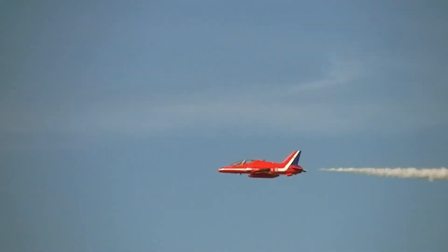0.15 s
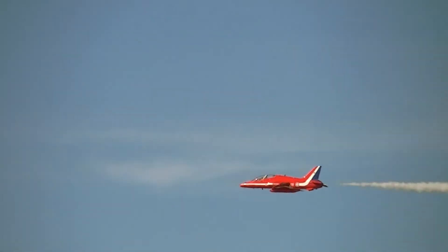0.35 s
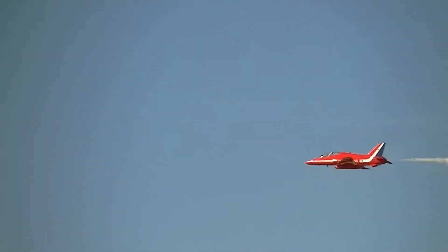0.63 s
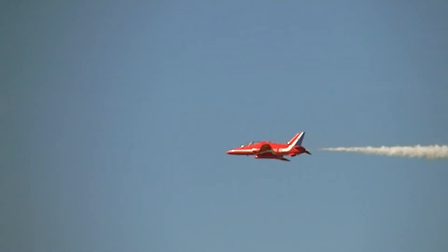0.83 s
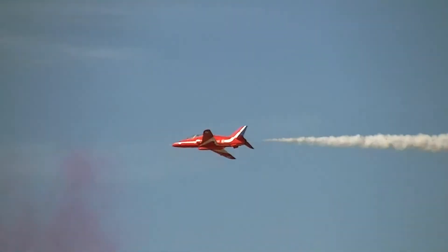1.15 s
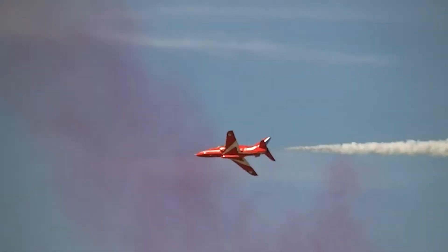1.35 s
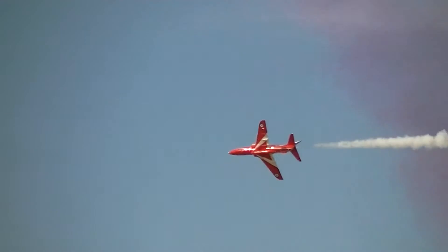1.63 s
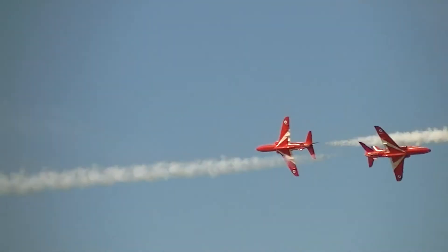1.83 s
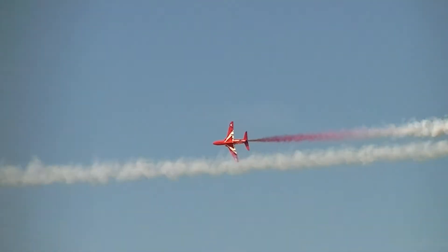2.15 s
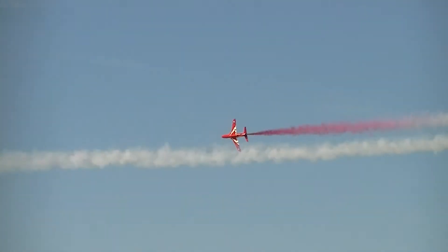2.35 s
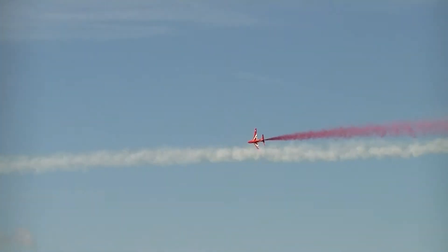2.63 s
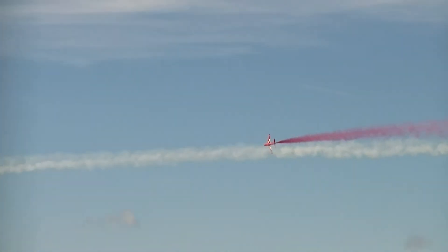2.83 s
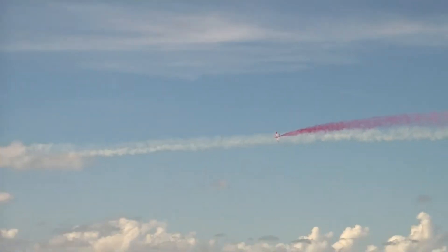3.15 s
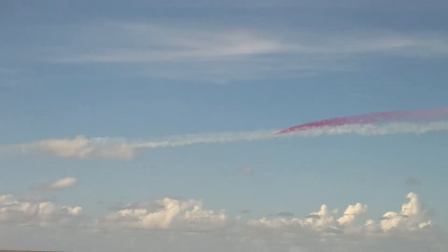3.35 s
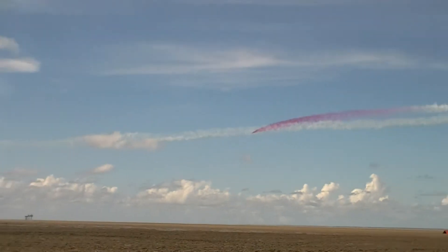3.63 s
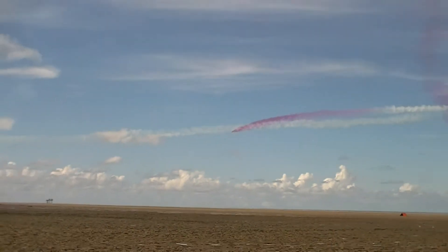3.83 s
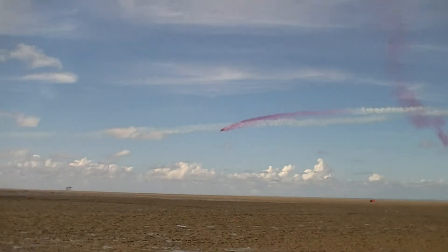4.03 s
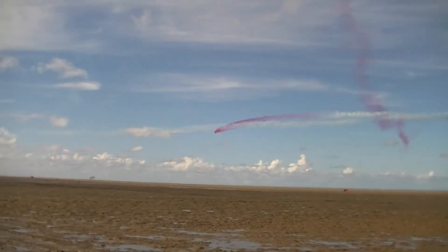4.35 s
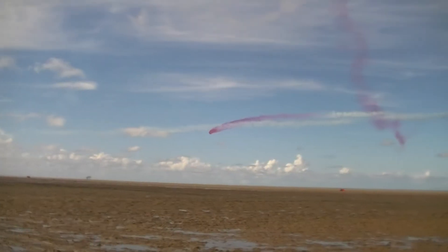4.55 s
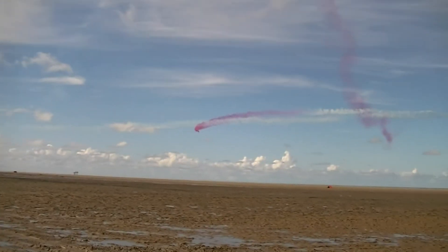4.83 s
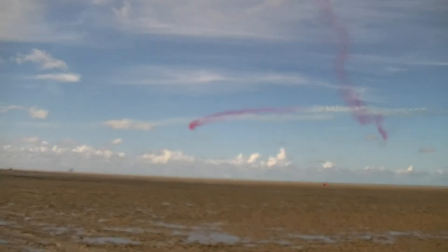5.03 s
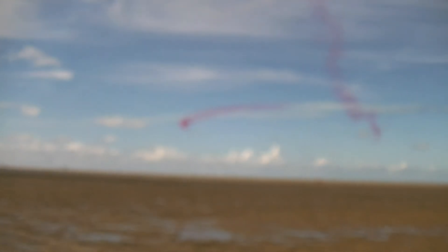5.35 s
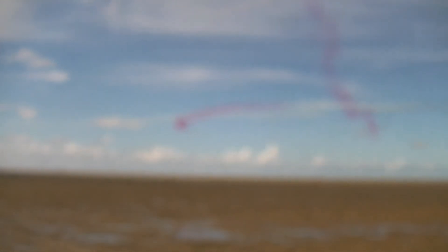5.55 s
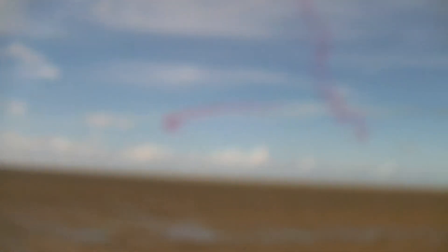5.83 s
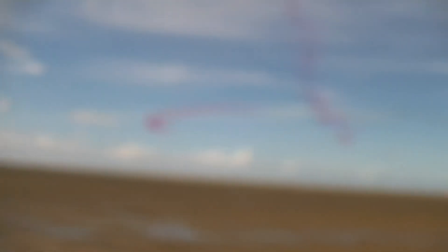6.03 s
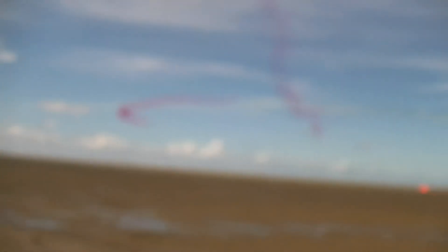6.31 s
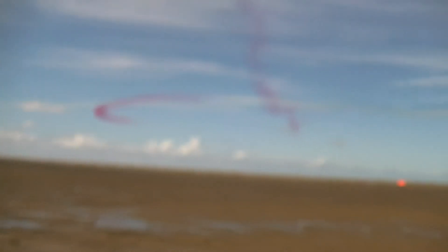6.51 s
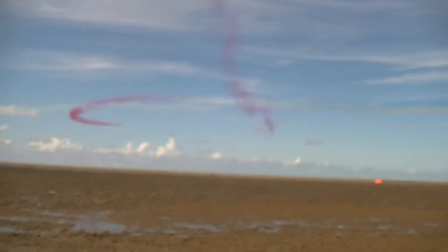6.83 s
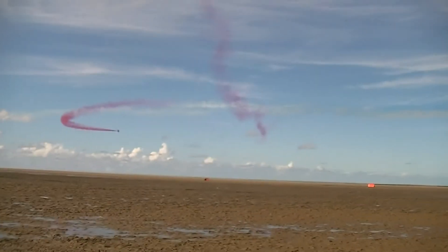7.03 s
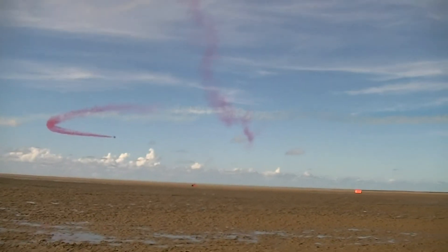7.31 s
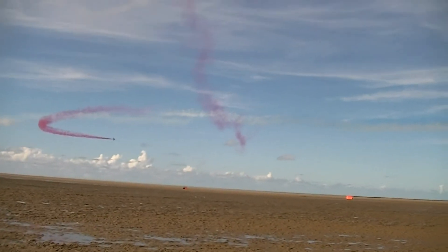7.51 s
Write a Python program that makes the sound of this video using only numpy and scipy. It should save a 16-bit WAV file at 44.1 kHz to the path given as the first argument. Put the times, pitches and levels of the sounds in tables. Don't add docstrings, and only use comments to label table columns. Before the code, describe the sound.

Outdoors on a wide flat beach, far jets make a broad, breathy mid-range roar that flutters and surges in the wind. A faint high whine slides down in the first half, the roar swells to its fullest past the middle, then turns duller and weaker. Gusts thump softly on a small camera microphone, with clicks, brief gain dips and fine gritty ticks.

```python
import sys
import numpy as np
from scipy import signal
from scipy.fft import rfft, irfft
from scipy.io import wavfile
from scipy.ndimage import uniform_filter1d

SR = 44100
rng = np.random.default_rng(int(sys.argv[2]) if len(sys.argv) > 2 else 0)


def put_to_file(sound):
    columns = np.atleast_2d(sound).T
    safe = np.clip(columns, -1, 1)
    whole_steps = np.round(safe * 32767)
    wavfile.write(sys.argv[1], SR, whole_steps.astype(np.int16))


def gain_from_db(level_db):
    decades = np.asarray(level_db, float) / 20
    return 10 ** decades


N = 338643

# time in seconds, level in dB, prominence of the middle of the roar in dB.
RUSH_LEVEL = [(0, -34.5, -2.5), (.7, -44, -3.5), (1.2, -31, 3.5), (2, -41, -3.5), (2.4, -33, 0),
              (3.3, -33.5, -1), (3.6, -30.5, 1.5), (3.8, -26.5, 3), (4.1, -29.5, 3), (4.75, -29.5, -1.5),
              (5.3, -23.5, 4), (5.7, -27.5, 1), (6.5, -29.5, -2), (7.35, -38, -4), (7.68, -35, -1.5)]
# frequency in Hz, density in dB per Hz.
RUSH_COLOUR = [(59, -82.5), (100, -53), (154, -29), (212, -20.5), (365, -10), (535, -3), (648, -2),
               (1170, -4.5), (1400, -6), (1950, -9.5), (3360, -23.5), (4550, -38), (5920, -58.5),
               (10000, -120)]
# time in seconds, first reinforced pitch in Hz, echo strength from 0 to 1.
GROUND_ECHO = [(0, 744, 0.15), (1, 775, 0.1), (2.2, 728, 0.03), (3.5, 910, 0.18), (4, 903, 0.33),
               (4.5, 800, 0.14), (5, 722, 0.22), (5.5, 690, 0.1), (6.3, 663, 0.14), (7, 681, 0.14),
               (7.68, 689, 0.3)]
# centre in seconds, half length in seconds, rise in dB.
SURGES = [(0.11, 0.025, 9.5), (0.279, 0.041, 4), (0.396, 0.032, 9.5), (0.562, 0.018, 17.5),
          (0.926, 0.015, 8.5), (1.231, 0.013, 3.5), (1.394, 0.025, 6), (1.513, 0.023, -1.5),
          (1.738, 0.077, 4.5), (1.915, 0.029, 4.5), (2.214, 0.069, 9.5), (3.135, 0.11, 2.5),
          (3.334, 0.089, 1), (3.526, 0.08, 3.5), (3.64, 0.037, 3.5), (3.904, 0.057, 11.5),
          (4.039, 0.065, 7), (4.269, 0.077, 10), (4.408, 0.067, 6.5), (4.622, 0.14, 5), (4.879, 0.034, 8),
          (5.133, 0.059, 4.5), (5.59, 0.019, 5.5), (5.996, 0.076, 7), (6.308, 0.064, 6.5),
          (6.626, 0.13, 3.5), (6.92, 0.071, 12.5), (7.093, 0.07, 7.5), (7.225, 0.017, 5.5),
          (7.534, 0.21, 6)]
# centre in seconds, half length in seconds, rise in
# dB.
FLUTTER = [(0.008, 0.029, 8), (.18, .025, 1.5), (0.482, 0.035, 6.5), (0.695, 0.037, 6), (1.007, 0.017, 9.5),
           (1.114, 0.011, 4), (1.15, 0.018, 4.5), (2.407, 0.089, 5), (2.84, 0.047, 1.5), (3.742, 0.01, 5),
           (4.149, 0.023, 8.5)]
# centre in seconds, half length in seconds, pitch in Hz, rise in dB.
FOCUSING = [(0.116, 0.024, 2600, 3), (0.109, 0.043, 1496, 1.5), (0.552, 0.027, 1400, -3.5),
            (0.922, 0.027, 4200, 9), (0.996, 0.027, 2200, -0.5), (1.109, 0.012, 2200, 9),
            (1.686, 0.023, 4300, 19), (1.987, .012, 4000, 10.5), (2.419, 0.032, 4100, 3.5),
            (3.476, 0.04, 2500, 9), (3.854, .03, 4000, -5), (3.899, 0.015, 2800, 5), (4.01, 0.037, 3000, 2),
            (4.385, .05, 5400, 2.5), (4.654, 0.069, 1100, 0), (5.102, 0.092, 5600, 1),
            (5.35, 0.26, 3450, 5.5), (5.407, 0.13, 2200, 3.5), (5.442, 0.073, 5500, 10.5),
            (4.545, 0.17, 3450, -2), (5.986, 0.083, 5500, 7.5), (0.288, 0.015, 3300, 8.5),
            (1.003, 0.044, 1530, -5.5), (1.23, 0.045, 1400, 9), (1.452, 0.05, 1790, 11.5),
            (1.512, 0.04, 1120, 13), (2.228, .04, 2060, 2.5), (3.346, 0.046, 2620, 9.5),
            (3.592, 0.12, 1840, 7), (3.907, 0.057, 1870, -6), (4.134, 0.15, 898, 8),
            (4.276, 0.048, 1470, -1), (4.418, 0.033, 1484, 9.5), (4.646, 0.04, 2110, 6.5),
            (4.877, 0.49, 934, 5), (5.186, 0.06, 1325, -2), (5.414, 0.093, 652, 11), (5.45, 0.55, 4530, 5),
            (5.502, 0.07, 2900, 7), (5.607, 0.008, 1200, 4.5), (5.997, 0.069, 1886, 4),
            (6.301, 0.029, 1194, 0.5), (6.238, .15, 620, 2.5), (6.792, 0.061, 660, 4.5),
            (6.961, 0.11, 800, 3), (6.908, 0.058, 1270, 2.5), (7.094, .03, 1403, 7.5),
            (7.561, 0.032, 880, 10)]
# time in seconds, pitch in Hz, level in dB,
# narrow share from 0 to 1.
FAN_WHINE = [(0, 3340, -60, .2), (.84, 3350, -59, .2), (.94, 3290, -43.5, .4), (1.03, 3330, -52, .3),
             (1.14, 3340, -46.5, .4), (1.3, 3350, -53, .3), (1.6, 3360, -54, .3), (1.85, 3370, -50.5, .4),
             (2.1, 3310, -54, .4), (2.3, 3260, -50, .7), (2.45, 3210, -42, .8), (2.65, 3130, -45.5, .75),
             (2.87, 3050, -45.5, .7), (3.2, 2950, -49, .5), (3.5, 2860, -48, .3), (3.75, 2800, -60, .3),
             (7.68, 2800, -95, .3)]
# time in seconds, level in dB.
FIZZ_LEVEL = [
    (0, -78),
    (.85, -76.5),
    (1.3, -73.5),
    (2, -74),
    (3.3, -73.5),
    (4.2, -79.5),
    (5.3, -78),
    (5.8, -80.5),
    (6.8, -81.5),
    (7.68, -88),
]
# frequency in Hz, density in dB per Hz.
FIZZ_COLOUR = [(3000, 5), (5500, -1), (8000, -11.5), (10000, -17.5), (12500, -26), (15500, -37),
               (18000, -77.5)]
# centre in seconds, half length in seconds, rise in dB.
RATTLES = [(.01, 0.035, 14), (.29, 0.1, 3), (.75, .035, 12.5), (1.68, 0.0099, 13.5), (1.74, 0.031, 10.5),
           (1.81, 0.017, 12), (1.9, .025, 9), (2.06, 0.037, 8.5), (2.185, 0.018, 6), (2.59, 0.021, 3),
           (3.21, 0.016, 12.5), (3.28, .035, 7), (3.685, 0.012, 11), (3.91, 0.062, 10.5), (6.225, .012, 10),
           (6.277, 0.022, 20), (6.1, .06, 5), (7.5, .06, 4)]
# time in seconds, level in dB.
BREEZE = [
    (0, -43.5),
    (1.4, -43),
    (2, -42.5),
    (2.8, -39),
    (3.2, -38),
    (4, -44),
    (5, -45.5),
    (6, -47),
    (7.68, -41.5),
]
# frequency in Hz, density in dB per Hz.
WIND_COLOUR = [(71, -69), (120, -39), (178, -27), (269, -3), (620, 1.5), (1120, -13), (2290, -22),
               (4550, -45.5), (5920, -83.5), (10000, -120)]
# centre in seconds, half length in seconds, rise in dB, left over right in dB.
GUSTS = [(.02, 0.056, 3.5, -9.5), (.422, 0.02, -6, 30), (.62, 0.088, 0.5, 7.5), (.8, 0.091, -4.5, 15),
         (1.185, 0.038, 8.5, -2), (1.44, 0.18, 9, 6.5), (2.014, 0.1, 7, 3), (2.378, 0.22, 3, 3),
         (2.98, 0.082, 3.5, -5.5), (3.434, 0.26, 3.5, -0.5), (3.76, 0.073, -1, -5.5),
         (4.122, 0.084, 9.5, 2.5), (4.85, 0.17, 9, 4.5), (5.22, 0.25, -6.5, 9), (5.508, 0.11, 6.5, -2),
         (5.79, 0.086, -0.5, -3), (6.42, 0.083, 10, 1), (7.22, 0.056, -3, 3), (7.45, 0.091, -7, -10.5)]
# time in seconds, click level in dB, duck depth in
# dB (none if negative).
LIMITER_SNAPS = [(0.0252, -44, 1), (0.1977, -36, 8.5), (0.3054, -54, -1.5), (0.321, -53.5, 3),
                 (0.418, -38, 12), (0.49, -47, 7.5), (0.578, -67, -5), (0.684, -44.5, -5), (0.861, -40, -4),
                 (0.8654, -30, 9), (1.0196, -52, 6), (1.166, -48.5, 3), (1.4056, -52, 4), (1.633, -60, 6),
                 (1.748, -45, 4.5), (1.7968, -61, 3), (1.9814, -46, -10), (2.13, -55, 3), (2.9005, -67, 1),
                 (3.0849, -46, -6), (3.2085, -58, 5.5), (3.6795, -65, 0.5), (4.2558, -41.5, -5),
                 (4.576, -57.5, 1), (4.947, -62, 2), (5.599, -62, 4), (6.274, -45, 0.5),
                 (6.8627, -58.5, -5.5), (7.677, -42, -1.5)]
# time in seconds, peak in dB.
GRIT_TICKS = [(0.5312, -67), (0.7173, -60), (0.7287, -58), (0.7544, -62), (1.1483, -55), (1.296, -56),
              (1.4194, -61), (1.4844, -60), (1.5219, -54), (1.6761, -50), (1.73, -54), (1.8527, -54),
              (1.8941, -60), (2.0248, -60), (2.1645, -62), (2.1779, -59), (3.1103, -61), (3.4301, -64),
              (3.5638, -64), (3.6795, -60), (3.706, -59), (3.8347, -62), (4.2204, -61), (4.3745, -73),
              (6.0277, -71), (6.0846, -68), (6.2158, -62), (6.2314, -65), (6.2464, -62), (6.2587, -57),
              (6.2684, -52), (6.2804, -52), (6.2874, -55), (6.2994, -59), (6.4482, -67), (6.4727, -62),
              (6.8887, -66)]
# start in seconds, length in seconds, start pitch in Hz, end pitch in Hz, level in dB.
BIRD_PEEPS = [
    (2.55, .17, 4510, 4300, -64),
    (2.71, .09, 4670, 4450, -66),
]

SURGE_GAIN, SURGE_IN_LOWS, SURGE_IN_HIGHS, SURGE_IN_FIZZ, SURGE_DUCKS_WIND = 1.194, 0.32, 0.99, 0.14, 0.68
TURN_AWAY_S, LOWS_GAIN_DB_PER_S, HIGHS_LOSE_DB_PER_S = 5.48, 1.3, 5
LEEWARD_DB, VEER_DB = -3, 2.5
BUFFET_DB, BUFFET_PER_S = 4.0, 14
OPPOSED = 0.14
RUMBLE_FADE_DB_PER_S = 1.1
RIGHT_DB = 0.55
HISS_DB = -94.5


def unit_rms(x):
    return x / np.sqrt(np.mean(x ** 2) + 1e-20)


def in_time(rows):
    s, *columns = np.transpose(rows)
    return [np.interp(np.arange(N) / SR, s, column) for column in columns]


def at_hz(points, hz):
    point_hz, level_db = np.transpose(points)
    return np.interp(np.log(hz), np.log(point_hz), level_db)


def drift(rate_hz):
    step = 20
    r = np.exp(-2 * np.pi * rate_hz * step / SR)
    white = rng.standard_normal(N // step + 2002)
    slow = signal.lfilter([1], [1, -2 * r, r * r], white)[2000:]
    return np.interp(np.arange(N) / step, np.arange(len(slow)), unit_rms(slow))


def band(x, low_hz, high_hz, order=2):
    sos = signal.butter(order, [low_hz, high_hz], "band", fs=SR, output="sos")
    return signal.sosfilt(sos, x)


def coloured(x, points):
    hz = np.arange(N // 2 + 1) * SR / N + 1
    return irfft(rfft(x) * gain_from_db(at_hz(points, hz)), N)


def grains(per_s, spread_db):
    sizes = gain_from_db(spread_db * np.minimum(rng.exponential(1, N), 4))
    signs = rng.choice([-1, 1], N)
    return sizes * signs * (rng.random(N) < per_s / SR)


def sides(pan_db):
    return gain_from_db(np.array([pan_db / 2, -pan_db / 2]))


def swells(rows, column=2, weights=None):
    t = np.arange(0, N, 64) / SR
    heights = [row[column] for row in rows] if weights is None else weights
    rise = sum(h * np.exp(-((t - row[0]) / row[1]) ** 2) for h, row in zip(heights, rows))
    return np.interp(np.arange(N) / SR, t, rise)


def focus(hz, octaves):
    nearness = [db * np.exp(-(np.log2(hz / top) / octaves) ** 2) for s, half, top, db in FOCUSING]
    return swells(FOCUSING, weights=nearness)


def rush_levels():
    level_db, presence_db = in_time(RUSH_LEVEL)
    surge_db = SURGE_GAIN * swells(SURGES + FLUTTER)
    away_s = np.maximum(np.arange(N) / SR - TURN_AWAY_S, 0)
    low_db = LOWS_GAIN_DB_PER_S * away_s - 1.27 * presence_db - (1 - SURGE_IN_LOWS) * surge_db
    high_db = -HIGHS_LOSE_DB_PER_S * away_s - presence_db - (1 - SURGE_IN_HIGHS) * surge_db
    return level_db + surge_db, low_db, high_db


def rush(shared_db, patchy_db, wide_db):
    level_db, low_db, high_db = rush_levels()
    swell_db, low_db, high_db = [c - c.mean() for c in (level_db, low_db, high_db)]
    white = coloured(rng.standard_normal((2, N)), RUSH_COLOUR)
    together_db = shared_db * 1.4 * np.tanh(drift(42.0))
    edges = 90 * 2 ** (np.arange(27) / 4)
    mid = 0
    for k, (low, high) in enumerate(zip(edges, edges[1:])):
        hz = np.sqrt(low * high)
        low_share = at_hz([(950, 0.92), (1250, 0)], hz)
        high_share = at_hz([(1900, 0.018), (2800, 0.93)], hz)
        moving_db = swell_db + low_db * low_share + high_db * high_share + together_db
        moving_db = moving_db * at_hz([(250, 0.18), (450, 0.79)], hz)
        gain = gain_from_db(moving_db + focus(hz, octaves=0.21) + patchy_db * drift(12.0))
        mid = mid + gain * band(white[k % 2], low, high, order=3)
    hump_hz, echo = in_time(GROUND_ECHO)
    bounce = np.interp(np.arange(N) - SR / hump_hz, np.arange(N), mid)
    mid = (mid + echo * bounce) / np.sqrt(1 + echo ** 2)
    steady = band(mid * gain_from_db(-swell_db), 1150, 2200, order=4)
    scale = gain_from_db(level_db.mean()) / np.std(steady)
    scattered = gain_from_db(wide_db) * np.roll(mid, 700)
    return scale * (mid + scattered * np.array([[1], [-1]]))


def whine(width_hz, blur_hz):
    hz, level_db, narrow = in_time(FAN_WHINE)
    turn = np.exp(2j * np.pi * np.cumsum(hz) / SR)
    broken = gain_from_db(level_db + 2.0 * drift(22))
    wide = drift(blur_hz) + 1j * drift(blur_hz)
    size = int(SR / width_hz)
    core = uniform_filter1d(wide.real, size) + 1j * uniform_filter1d(wide.imag, size)
    core = core / np.std(core.real)
    smear = np.sqrt(narrow) * core + np.sqrt(1 - narrow) * wide
    return broken * np.real(smear * turn)


def fizz(per_s, crackle_db, wide_db):
    level_db = in_time(FIZZ_LEVEL)[0] + swells(RATTLES) + SURGE_IN_FIZZ * swells(SURGES)
    raw = rng.standard_normal((2, N)) * gain_from_db(3.7 * drift(30))
    clumped_per_s = per_s * gain_from_db(8.9 * drift(24))
    raw[0] += gain_from_db(crackle_db) * unit_rms(grains(clumped_per_s, spread_db=11.0))
    mid, side = coloured(raw, FIZZ_COLOUR)
    scale = gain_from_db(level_db + 0.5) / np.std(band(mid, 6000, 10000, order=4))
    return scale * (mid + gain_from_db(wide_db) * side * np.array([[1], [-1]]))


def preamp_hiss():
    own, common = rng.standard_normal((2, N)), rng.standard_normal(N)
    return gain_from_db(HISS_DB) * unit_rms(band(own + 3 * common, 6000, 15500))


def wind(per_s, lumpy_db, bed_db, rumble_db):
    level_db = in_time(BREEZE)[0] + swells(GUSTS) - SURGE_DUCKS_WIND * swells(SURGES)
    pan_db = LEEWARD_DB + swells(GUSTS, column=3) + VEER_DB * drift(1.6)
    ports = []
    for port in range(2):
        bursts = unit_rms(grains(per_s * gain_from_db(lumpy_db * drift(12)), spread_db=2.0))
        bed = gain_from_db(bed_db + 3.5 * drift(36)) * rng.standard_normal(N)
        ports.append(unit_rms(coloured(bursts + bed, WIND_COLOUR)))
    ports = np.array(ports)
    ports = ports - OPPOSED * ports[::-1]
    rumble_db = rumble_db - RUMBLE_FADE_DB_PER_S * np.arange(N) / SR + 5.5 * drift(3.3)
    rumble = gain_from_db(rumble_db) * unit_rms(band(rng.standard_normal((2, N)), 105, 430))
    buffet = gain_from_db(BUFFET_DB * np.tanh(drift(BUFFET_PER_S)) - 1.5)
    return buffet * (gain_from_db(level_db + 4.0) * sides(1.65 * pan_db) * ports + rumble)


def pumping(near, threshold_db, share, release_db_per_s):
    peak_db = 20 * np.log10(np.abs(near).max(axis=0) + 1e-9)
    over_db = np.maximum(peak_db - threshold_db, 0)
    ramp = release_db_per_s * np.arange(N) / SR
    held_db = np.maximum.accumulate(over_db + ramp) - ramp
    return gain_from_db(-share * uniform_filter1d(held_db, size=60))


def limiter(hold_s, recover_s, click_db, click_hz, dull_hz):
    t = np.arange(N) / SR - 0.001
    duck_db, steps = np.zeros(N), np.zeros(N)
    for s, peak_db, depth_db in LIMITER_SNAPS:
        back = np.clip((t - s - hold_s) / recover_s, 0, 1)
        duck_db = np.maximum(duck_db, max(depth_db, 0) * (t > s) * (1 - back) ** 2)
        steps[np.searchsorted(t, s)] = gain_from_db(peak_db + click_db)
    smooth_db = uniform_filter1d(uniform_filter1d(duck_db, size=40), size=40)
    return gain_from_db(-smooth_db), band(np.cumsum(steps), click_hz, dull_hz)


def lens_motor(start_s, end_s, level_db):
    t = np.arange(N) / SR
    on = np.clip((t - start_s) / 0.043, 0, 1) * (t < end_s)
    return gain_from_db(level_db) * on * unit_rms(band(rng.standard_normal(N), 6300, 8400, order=3))


def ticks(decay_s, gain_db, low_hz, high_hz):
    kicks = np.zeros(N) + 1e-18
    for s, peak_db in GRIT_TICKS:
        kicks[int(s * SR)] = gain_from_db(peak_db + gain_db)
    puffs = signal.lfilter([1], [1, -np.exp(-1 / (decay_s * SR))], kicks)
    return band(puffs * rng.standard_normal(N), low_hz, high_hz)


def bird():
    out, t = np.zeros(N), np.arange(N) / SR
    for s, length, start_hz, end_hz, level_db in BIRD_PEEPS:
        u = np.clip((t - s) / length, 0, 1)
        phase = 2 * np.pi * np.cumsum(start_hz + (end_hz - start_hz) * u) / SR
        out += gain_from_db(level_db) * np.sqrt(2 * np.sin(np.pi * u) + 1e-12) * np.sin(phase)
    return out


def scene():
    far = rush(shared_db=1.38, patchy_db=2.3, wide_db=-25.5)
    far = far + whine(width_hz=160, blur_hz=260)
    far = far + fizz(per_s=350, crackle_db=-11.5, wide_db=-13.5)
    far = far + lens_motor(0.14, 0.418, level_db=-71.0) + bird()
    near = wind(per_s=150, lumpy_db=1.8, bed_db=-4.0, rumble_db=-55)
    duck, clicks = limiter(hold_s=0.0085, recover_s=0.033, click_db=18.5, click_hz=800, dull_hz=9300)
    duck = duck * pumping(near, threshold_db=-30, share=0.4, release_db_per_s=450)
    clicks = clicks + ticks(decay_s=0.0012, gain_db=3.5, low_hz=4000, high_hz=9500)
    far = duck * far * sides(-RIGHT_DB)[:, None]
    return far + near + clicks * sides(1.5)[:, None] + preamp_hiss()


def roll_off(x):
    return signal.sosfilt(signal.butter(12, 15700, fs=SR, output="sos"), x)


def record(dry):
    rounded = np.tanh(dry)
    wind_filter = signal.butter(3, 135, "high", fs=SR, output="sos")
    mix = signal.sosfilt(wind_filter, rounded)
    return roll_off(mix)


dry = scene()
out = record(dry)
put_to_file(out)
```